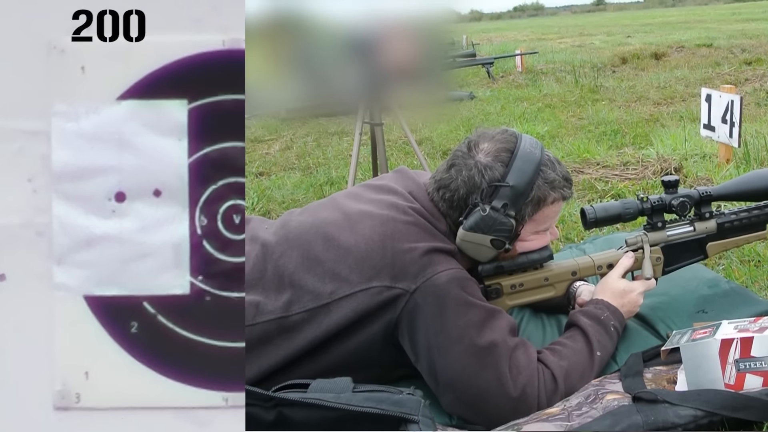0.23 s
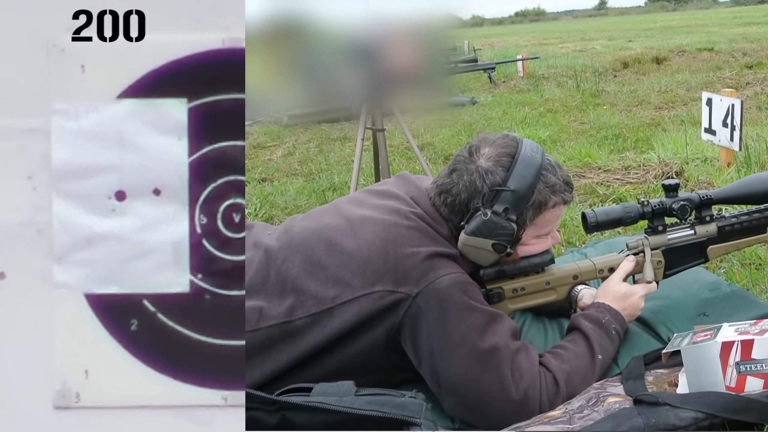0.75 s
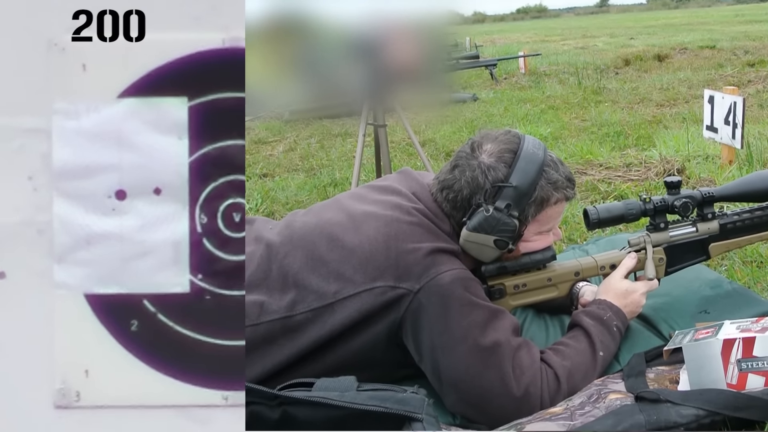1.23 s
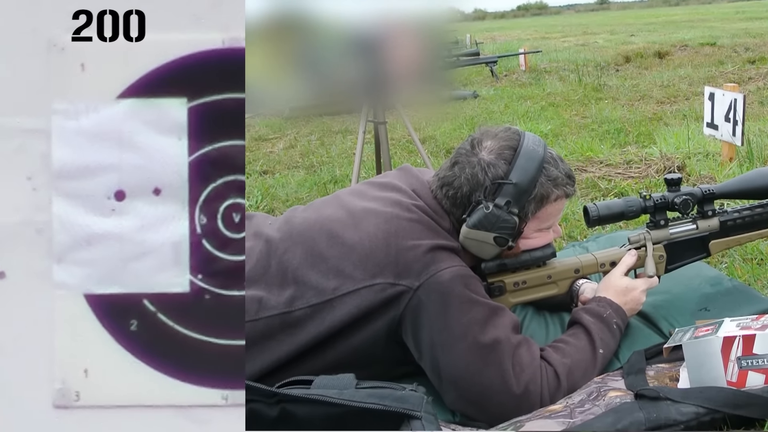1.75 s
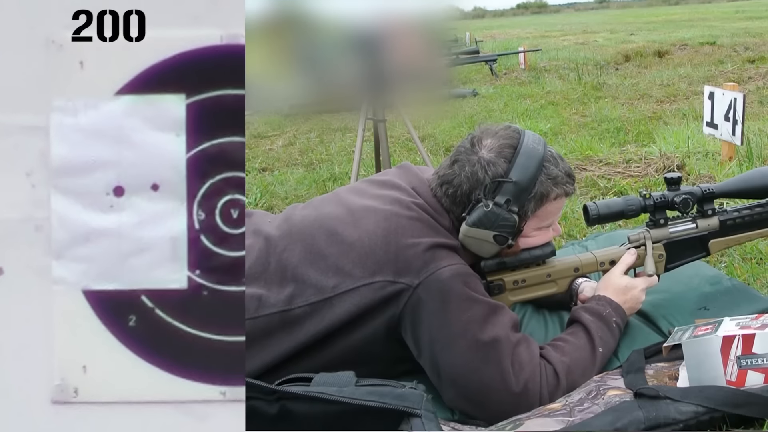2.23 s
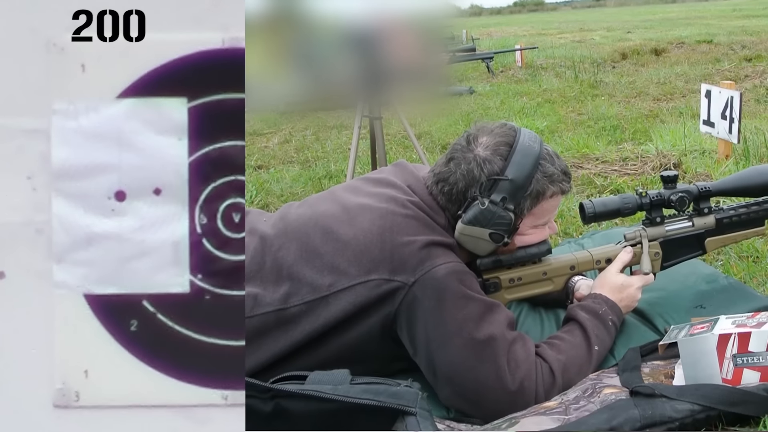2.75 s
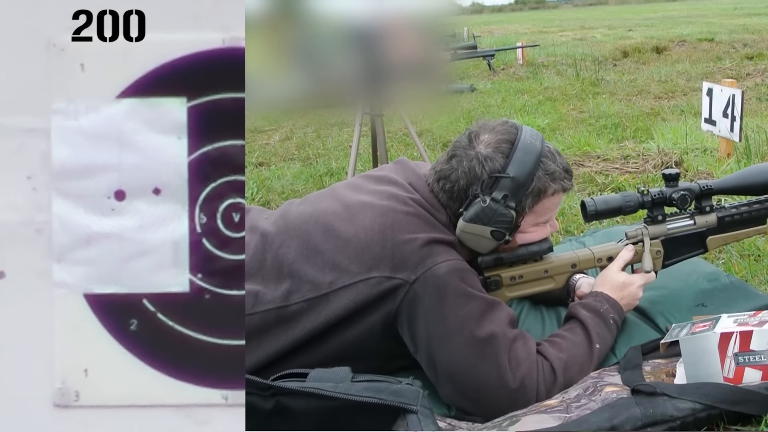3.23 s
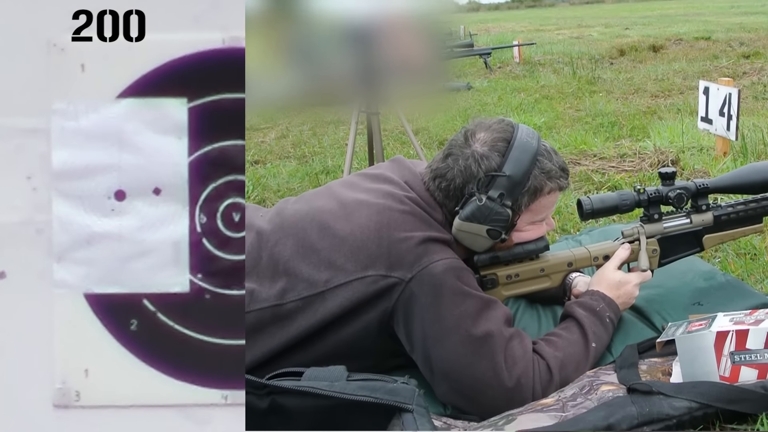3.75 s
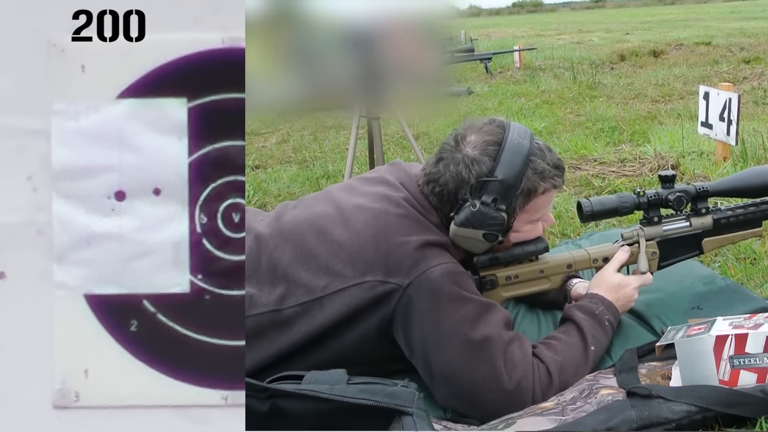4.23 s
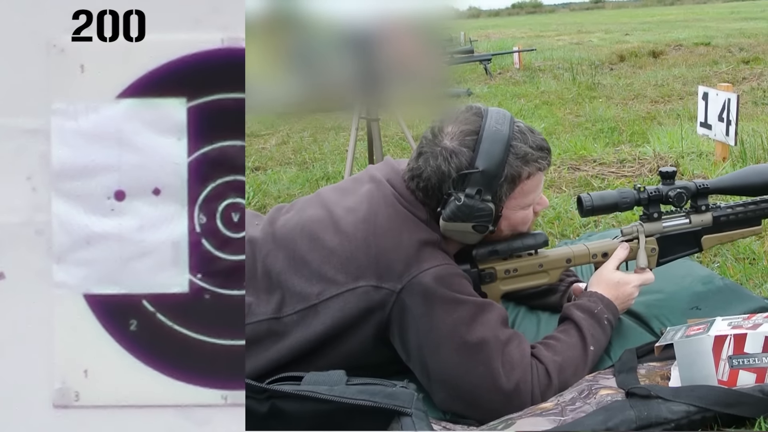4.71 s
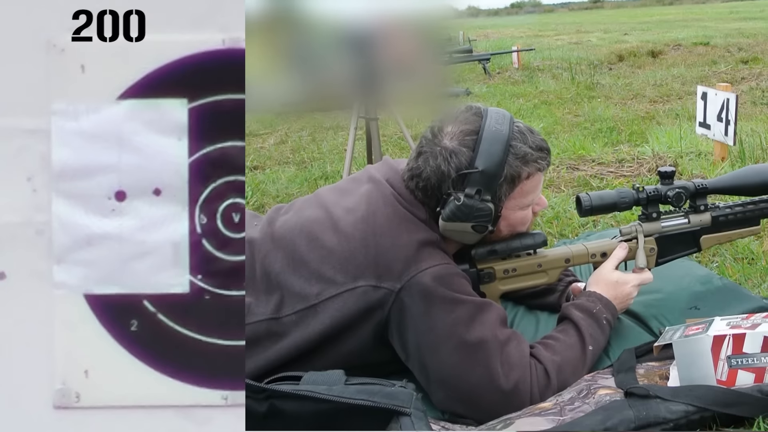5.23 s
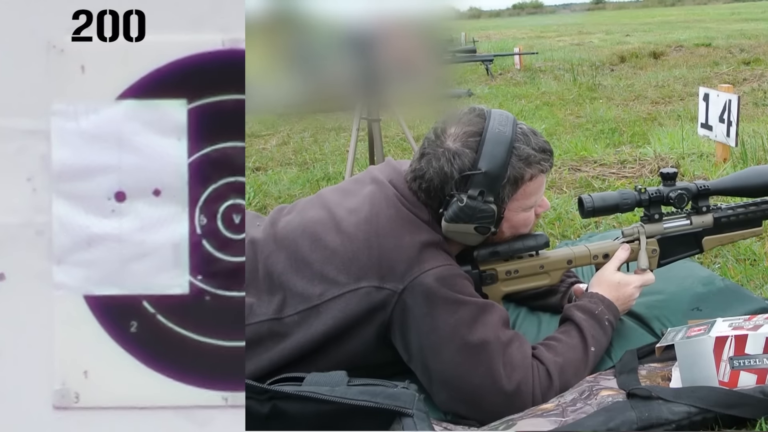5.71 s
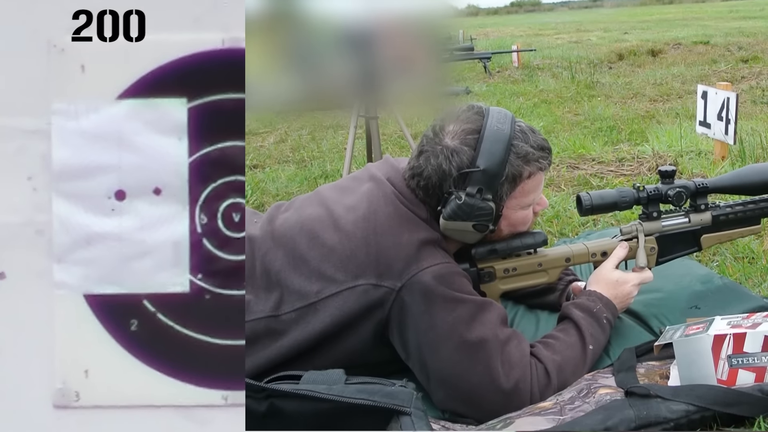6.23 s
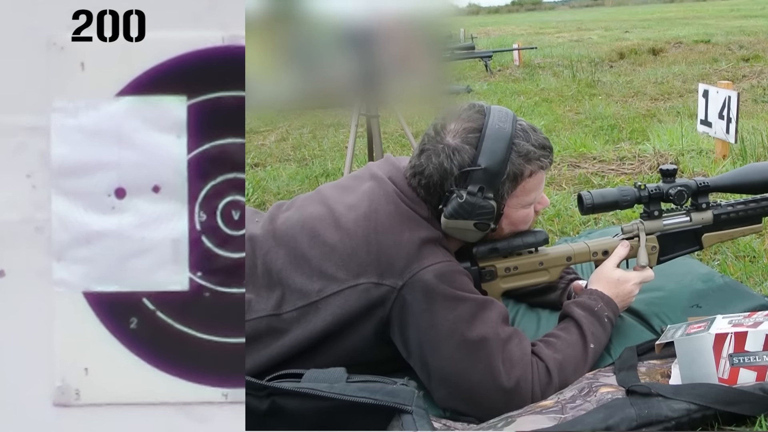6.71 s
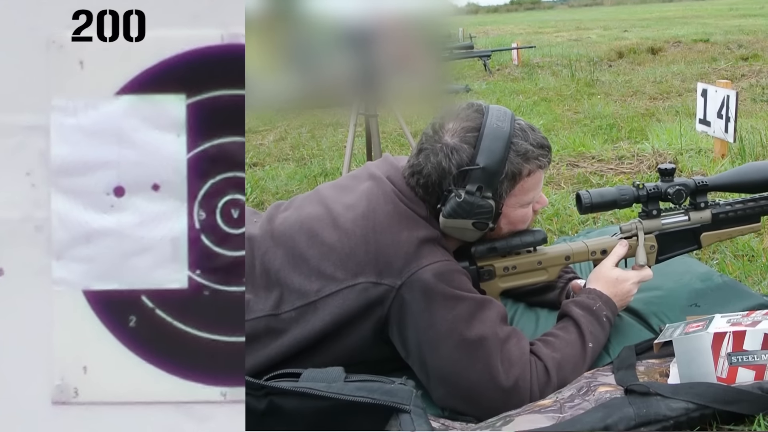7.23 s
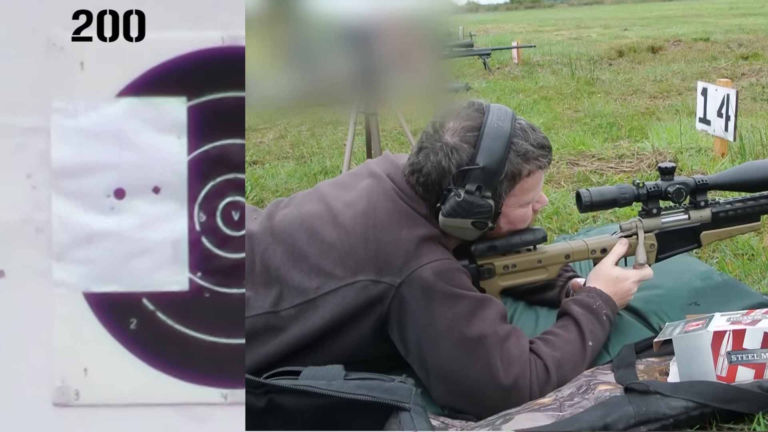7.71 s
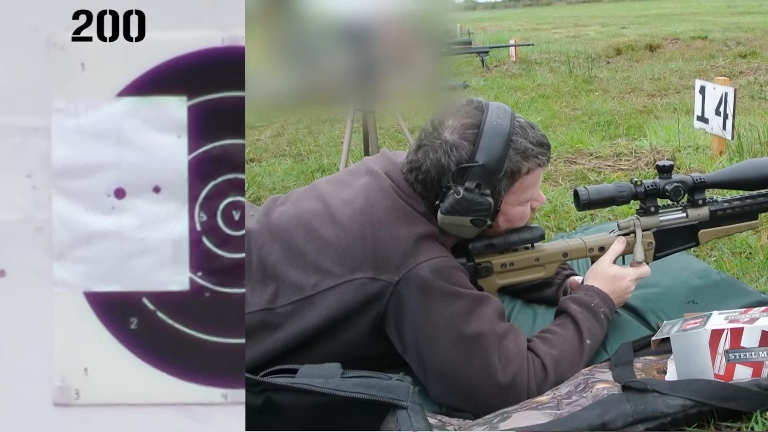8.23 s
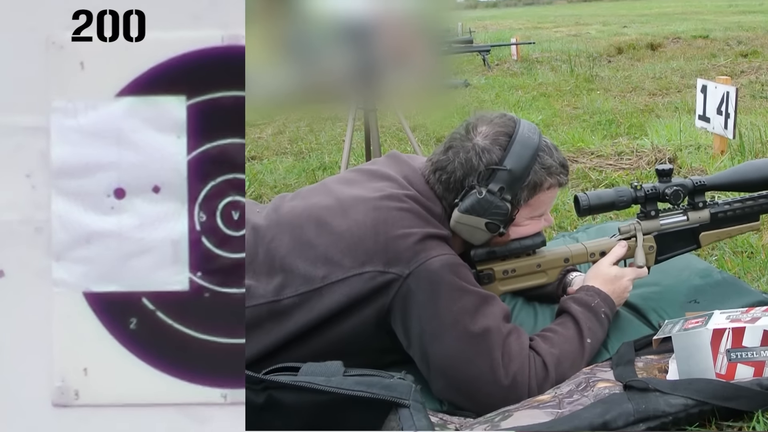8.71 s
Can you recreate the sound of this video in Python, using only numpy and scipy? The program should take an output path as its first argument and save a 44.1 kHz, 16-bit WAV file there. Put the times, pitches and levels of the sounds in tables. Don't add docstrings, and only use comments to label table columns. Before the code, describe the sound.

Four rifle shots crack and boom across an open grass range, echoes hissing away, with bolt clicks between and wind buffeting the microphone.

```python
import sys
import numpy as np
from scipy import signal
from scipy.fft import rfft, irfft
from scipy.io import wavfile

SR = 44100
rng = np.random.default_rng(int(sys.argv[2]) if len(sys.argv) > 2 else 0)


def waveform_to_disk(signal):
    frames = np.transpose(np.atleast_2d(signal))
    scaled = np.clip(frames, -1, 1) * 32767
    samples = np.round(scaled).astype(np.int16)
    wavfile.write(sys.argv[1], SR, samples)


def boost(x):
    u = np.asarray(x, float) / 20
    return 10 ** u


N = 395136
TIME = np.arange(N) / SR
LOW_ROLL_RISE_S = 0.0052

# start_s, hiss_db, hiss_t60_s, pan_db (left-right), wide_db (wider scatter)
SHOTS = [
    (.9030, -21, 0.034, 1.2, -20.5),
    (2.0208, -9.5, 0.027, 0.45, -21.5),
    (5.0483, -12, 0.069, 1, -28),
    (7.1342, -17.5, 0.078, 1, -24),
]
# hiss_db, top_db, low_roll_db, low_roll_fall_db_per_s
ROLL = [
    (-65, -65.5, -30.5, 201),
    (-73.5, -72.5, -33.5, 199.5),
    (-57.5, -60.5, -36, 199.5),
    (-49.5, -52.5, -34.5, 151.5),
]
# frequency_hz, level_db (per Hz)
ROLL_BODY = [(350, -32.5), (600, -13.5), (891, -10), (1130, -7), (1560, 0), (2670, 4.5), (3740, 3.5),
             (6000, -12.5), (7800, -43.5), (13200, -120)]
# frequency_hz, level_db (per Hz)
ROLL_TOP = [(2650, -30), (4500, -1), (6300, -4), (7920, -6), (11000, -20), (14000, -43.5)]
# start_s, peak_db, pitch_hz, pan_db (left-right)
BUFFETS = [(0.324, -44.5, 272, 2.5), (1.89, -32, 164, -1), (3.096, -41.5, 223.5, 0), (3.65, -50.5, 195, -1),
           (3.712, -52, 198, -3.5), (4.832, -43.5, 340, 0), (6.024, -22.5, 150, 1),
           (6.103, -24.5, 162, -3.5), (6.172, -25.5, 194.3, -4), (6.205, -22.5, 189, 7),
           (6.466, -27.5, 186, 5.5), (6.564, -29, 170.5, -4), (6.631, -24, 177.4, 3),
           (6.795, -26, 216, -6.5), (6.947, -17, 174, -4), (7.017, -20.5, 201, 4), (7.041, -25, 179, 9),
           (7.944, -22.5, 248, -2), (8.156, -16.5, 181, 3.5), (8.273, -14.5, 160, 4.5),
           (8.376, -13, 158, -8.5), (8.417, -13, 193.2, 7.5), (8.653, -28.5, 137, 13),
           (8.705, -14.5, 195.8, 11), (8.796, -20.5, 203.7, 11), (8.831, -19.5, 219, 20),
           (8.908, -13, 216, -15)]


def rms_one(x):
    return x / np.sqrt(np.mean(x ** 2) + 1e-20)


def sides(pan_db):
    return boost(np.array([[.5], [-.5]]) * pan_db)


def add(out, s, sound):
    i = round(s * SR)
    out[:, i:i + sound.shape[-1]] += sound[..., :N - i]


def drift(rate):
    pole = np.exp(-80 * np.pi * rate / SR)
    noise = rng.standard_normal(N // 40 + 2002)
    slow = signal.lfilter([1], [1, -2 * pole, pole * pole], noise)[2000:]
    return np.interp(np.arange(N) / 40, np.arange(len(slow)), rms_one(slow))


def coloured(spectrum, side_db, size=N):
    hz, level_db = np.transpose(spectrum)
    log_hz = np.log(np.fft.rfftfreq(size, 1 / SR) + 1)
    gain = boost(np.interp(log_hz, np.log(hz), level_db, left=-120, right=-120))
    mid, side = irfft(rfft(rng.standard_normal((2, size))) * gain, size)
    return rms_one(mid + boost(side_db) * side * [[1], [-1]])


def curve(spans, fade_s):
    gain = np.zeros(N)
    for rows in spans:
        s, level_db = np.transpose(rows)
        s = np.r_[s[0] - fade_s, s, s[-1] + fade_s]
        level_db = np.r_[level_db[0] - 12, level_db, level_db[-1] - 30]
        gain = np.maximum(gain, boost(np.interp(TIME, s, level_db, left=-200, right=-200)))
    return gain


def thump(hz, swell_s, dip_s):
    t = TIME[:2200]
    swell = (t / swell_s * np.exp(1 - t / swell_s)) ** 1.5
    ring = swell * np.sin(2 * np.pi * hz * (t - dip_s))
    return signal.sosfilt(signal.butter(1, 50, "high", fs=SR, output="sos"), ring)


def rings(modes, strengths_db, t):
    total = 0
    for more_db, (hz, db, t60) in zip(strengths_db, modes):
        total = total + boost(db + more_db - 60 * t / t60) * np.sin(2 * np.pi * hz * t)
    return total


def scatter(bright_db, size):
    body = coloured(ROLL_BODY, side_db=-15.5, size=size)
    return body + boost(bright_db + 13.0) * coloured(ROLL_TOP, side_db=-8.0, size=size)


def facing(x):
    # frequency_hz, pan_db (left-right)
    ports = [(3500, 0.5), (5200, 6), (7500, 11), (10000, 5), (12500, -3), (16000, -4)]
    hz, pan_db = np.transpose(ports)
    log_hz = np.log(np.fft.rfftfreq(x.shape[-1], 1 / SR) + 1)
    pan_db = np.interp(log_hz, np.log(hz), pan_db)
    return irfft(rfft(x) * sides(pan_db), x.shape[-1])


def field():
    # start_s, level_db
    hum_levels = [(0, -62), (.9, -65), (2.001, -74), (3.1, -82), (4.6, -73), (5.2, -71.5), (6.5, -66.5),
                  (7.5, -61), (8.96, -57)]
    # frequency_hz, level_db (per Hz)
    hum_colour = [(59, -35.5), (100, -5.5), (210, -5), (381, -1.5), (608, -7.5), (1100, -5), (1610, -8.5),
                  (2040, -12.5), (3700, -16.5), (10700, -28), (12600, -31.5), (13600, -48.5)]
    # start_s, level_db
    grass_levels = [
        (0, -108),
        (6, -106),
        (7, -84),
        (8.96, -84),
    ]
    # frequency_hz, level_db (per Hz)
    grass_colour = [(11000, -20.5), (13000, 0), (15000, -7.5), (15800, -14.5)]
    # pitch_hz, width_hz, level_db
    drone_modes = [
        (1120, 110, -75.5),
        (1650, 60, -76),
        (2200, 110, -80),
    ]
    hum_db = np.interp(TIME, *np.transpose(hum_levels))
    out = boost(hum_db + 0.6 * drift(5)) * coloured(hum_colour, side_db=-8.5)
    grass_db = np.interp(TIME, *np.transpose(grass_levels))
    out += boost(grass_db) * coloured(grass_colour, side_db=-6.0)
    fade_db = np.interp(TIME, [.9, 2.2], [0, -20])
    for hz, width_hz, db in drone_modes:
        skirts = [(hz - 2 * width_hz, -25), (hz, 0), (hz + 2 * width_hz, -25)]
        out += coloured(skirts, side_db=-10.5) * boost(db + 2.3 * drift(6) + fade_db)
    return out


def port_gains():
    # start_s, throb_db, deep_db (relative to the throb)
    wind_levels = [(0, -76, 8), (.22, -62, -3), (.45, -82, 9), (.9, -77, 2), (1.299, -53, -9.5),
                   (1.581, -55, 1.5), (1.802, -66.5, -10.5), (2.302, -60, -14.5), (2.55, -50.5, -12),
                   (2.719, -95.5, -11), (3.4, -81, -1), (4.881, -79.5, -2), (5.0, -66, -13),
                   (5.751, -64.5, 1.5), (6.35, -63, 6.5), (6.751, -42, -4), (7.75, -57, -1.5),
                   (8.96, -47, 7.5)]
    # start_s, throb_db, fall_db_per_s
    gusts = [(1.624, -44.5, 250), (2.0, -59.5, 349.5), (2.519, -55.5, 198.5), (2.659, -59, 302),
             (2.811, -59, 178), (3.03, -58.5, 252), (2.95, -60.5, 299.5), (5.575, -47, 256),
             (5.625, -48.5, 250), (7.289, -43.5, 200), (7.39, -54, 250), (7.47, -50, 300),
             (7.57, -49.5, 150.5), (8.31, -33, 199), (5.676, -48, 299.5), (5.845, -43, 343)]
    s, throb_db, deep_db = np.transpose(wind_levels)
    throb = boost(np.interp(TIME, s, throb_db))
    deep = boost(np.interp(TIME, s, throb_db + deep_db))
    # lag 0.0058 s, 17.5 dB weaker, falling 165.5 dB per s
    wakes = [(s + 0.0058, peak_db - 17.5, 165.5) for s, peak_db, *rest in BUFFETS]
    coarse = TIME[::64]
    swell_db = np.full(len(coarse), -200.)
    for s, peak_db, fall in gusts + wakes:
        away_s = np.maximum(coarse - s, 2.2 * (s - coarse))
        swell_db = np.maximum(swell_db, peak_db - fall * away_s)
    swell_db = np.interp(TIME, coarse, swell_db)
    throb = np.hypot(throb, boost(swell_db))
    deep = np.hypot(deep, boost(swell_db - 7.5))
    for (s, *rest), (*hiss, low_db, fall) in zip(SHOTS, ROLL):
        after = np.maximum(TIME - s, 0)
        rise = np.minimum(after / LOW_ROLL_RISE_S, 1) ** 2
        deep = np.maximum(deep, rise * boost(low_db - 10.5 - 1.5 * fall * after))
    return throb, deep


def wind():
    # frequency_hz, level_db (per Hz)
    throb_colour = [(71, -38.5), (120, 2), (211, 4), (330, -9.5), (403, -19), (517, -23.5), (600, -31.5),
                    (780, -61), (1320, -120)]
    gust_colour = [(160, -31), (280, 1.5), (433, -9.5), (484, -16), (675, -25.5), (900, -27), (1170, -59.5),
                   (1980, -120)]
    rumble_colour = [(12, -59), (20, -32.5), (54, -11.5), (87, -0.5), (130, 0.5), (170, -29.5), (290, -120)]
    throb, deep = port_gains()
    out = throb * boost(-3.0 + 4.9 * drift(18)) * coloured(throb_colour, side_db=-12.0)
    out += throb ** 1.23 * boost(-2.0 + 4.6 * drift(28)) * coloured(gust_colour, side_db=-2.0)
    out += deep * boost(-1.0 + 0.46 * drift(8)) * coloured(rumble_colour, side_db=-12.0)
    for s, peak_db, hz, pan_db in BUFFETS:
        puff = thump(hz, 0.65 / hz, dip_s=0.41 / hz) * sides(pan_db)
        front = np.roll(thump(2.06 * hz, 0.5 / hz, dip_s=0), 110)
        edge = boost(-16.0) * front * sides(-pan_db)
        add(out, s + 0.00291, -boost(peak_db - 4.0) * (puff + edge))
    return out


def action():
    # start_s, peak_db, brass_db (brass ring)
    contacts = [(3.2179, -56, -28.5), (3.2368, -63.5, -17), (3.256, -48, -32), (3.2713, -54, -15),
                (3.2976, -46.5, -15), (3.362, -57, -20), (3.9554, -44, -4.5), (3.985, -59.5, -20),
                (4.021, -62.5, -25), (4.034, -49.5, -7.5), (4.0555, -51, -11), (4.076, -51, -7),
                (4.0968, -37, -22), (4.105, -41, -6), (4.121, -45, -13), (4.1403, -49.5, -6.5),
                (4.1524, -50.5, -15), (4.1579, -50, -17), (4.185, -53, -13), (4.209, -63, -28),
                (4.2254, -55.5, -27), (4.2616, -54.5, -26), (4.283, -66, -31), (4.3, -40.5, -28),
                (4.3319, -56, -32), (4.351, -65.5, -30)]
    # pitch_hz, level_db, t60_s
    steel_modes = [(1552, -10, 0.022), (2140, -16, 0.023), (2967, 0, 0.022), (3185, -6, 0.033),
                   (4214, -14, 0.031), (6500, -9, 0.019), (7000, -4, 0.013), (7460, -10, 0.017),
                   (8214, -11, .015), (11300, -20, .012), (12500, -21, .012)]
    # pitch_hz, level_db, t60_s
    brass_modes = [(6190, 13, 0.041), (6370, -1, .04), (7000, 2, 0.033), (10260, -21, .05),
                   (12020, -10, .03), (13610, -12, .06), (14440, -11, .09)]
    # start_s, level_db
    slide_levels = [
        [(3.22, -81), (3.3, -74.5), (3.4, -80.5)],
        [(3.96, -78), (4.03, -76), (4.1, -77), (4.155, -59.5), (4.18, -75), (4.27, -73), (4.36, -79)],
    ]
    # frequency_hz, level_db (per Hz)
    grate_colour = [(900, -21), (1550, -5), (1800, -12), (2100, -2), (2500, -18), (3100, -2), (4300, -27),
                    (7000, -19), (9500, -32)]
    out, t = np.zeros((2, N)), TIME[:4096]
    soft = np.minimum(t / .0004, 1)
    for s, peak_db, brass_db in contacts:
        for lag_s, loss_db in ((0, 0), (.004, -14)):
            chance_db = rng.normal(0, 4, len(steel_modes) + len(brass_modes))
            metal = rings(steel_modes, chance_db, t * rng.uniform(0.95, 1.04))
            brass_strengths_db = brass_db + 1.4 * chance_db[::-1]
            metal = metal + rings(brass_modes, brass_strengths_db, t * rng.uniform(0.98, 1.004))
            tick = scatter(-22.5, len(t)) * boost(0.5 - 60 * t / 0.019)
            add(out, s + lag_s, (metal + tick) * soft * boost(peak_db + loss_db - 12.0) * sides(5.73))
    grate = coloured(grate_colour, side_db=-10.5) * boost(4.5 * drift(70))
    return out + curve(slide_levels, fade_s=0.0094) * grate * sides(1.3)


def slaps():
    # start_s, peak_db, pitch_hz, pan_db (left-right), bright_db
    slap_echoes = [(0.9175, -28, 2600, 2, -15), (0.9327, -21, 3270, 2, -33), (0.9350, -21, 2300, -1, -24),
                   (1.158, -40, 1270, 1, -40.5), (1.224, -56, 2500, 1, -21), (1.29, -50.5, 650, 2, -40),
                   (0.9537, -31.5, 1900, 7, -17), (1.115, -36, 3040, 2, -13.5), (1.1571, -36, 3330, 4, -17),
                   (1.1859, -42, 3050, 5.5, -17.5), (1.215, -44, 2400, 0.5, -14),
                   (1.29, -42, 2520, -4, -36.5), (2.03, -25, 3020, -3, -22.5),
                   (2.0521, -17.5, 2674, -2, -27), (2.0365, -22, 2700, 0.5, -34),
                   (2.046, -26.5, 2800, -2, -32), (2.0761, -42, 2390, 2, -30),
                   (2.093, -42, 1912, 1.0, -29.5), (2.1769, -56.5, 3046, 2, -29),
                   (2.2272, -58, 3016, 3, -35), (2.258, -55, 2107, 3, -35.5), (2.329, -48.5, 586, 2, -41),
                   (2.321, -44, 2010, -4, -20), (2.3357, -45, 2045, -3.5, -32), (2.4038, -41, 3240, 2, -24),
                   (2.4217, -29.5, 4047, -3.5, -18), (2.8363, -45.5, 4100, -6, -23),
                   (5.37, -43.5, 1290, -3, -29), (5.3834, -23.5, 2584, 1, -26.5),
                   (6.958, -53, 600, 2, -40.5), (8.379, -52, 590, -3, -39), (7.3903, -32, 4470, 5, -25),
                   (7.3912, -27.5, 2900, 0, -22), (7.422, -36, 2925, 8, -28), (7.3905, -31.5, 1500, 2, -30),
                   (7.448, -36.5, 1150, 0, -35), (1.115, -43, 1600, 0, -14)]
    # start_s, peak_db, pitch_hz, pan_db (left-right), bright_db
    far_cracks = [(.0913, -50.5, 2230, 4, -29.5), (.382, -50.5, 3960, 3.5, -23),
                  (.527, -57, 2900, 0.5, -30), (.616, -49.5, 3570, -3.5, -32), (.839, -54, 3000, 0.5, -28),
                  (.868, -57, 2500, 0.5, -28), (1.833, -58, 8200, 1.5, -10),
                  (1.8896, -42.5, 2040, 1.5, -30), (1.8906, -40.5, 895, 0, -45),
                  (2.319, -57, 8500, 0.5, -25), (3.0977, -49.5, 2147, 2, -33.5),
                  (4.824, -50, 3109, 5, -27.5), (4.8324, -34, 2900, 4, -11),
                  (4.8325, -41.5, 1950, 4, -29.5), (4.8327, -44, 593, 2, -40), (6.883, -48, 1919, 3, -28.5),
                  (7.355, -53, 13100, -0.5, -45), (7.355, -60, 15000, 0, -45)]
    # start_s, peak_db, bright_db, t60_s
    swells = [(1.145, -44, -12, 0.14), (1.176, -44, -14, 0.13), (7.421, -36, -14, 0.13),
              (7.452, -39, -5, 0.12), (2.782, -54.5, -10, 0.077), (1.3657, -43.5, -28.5, 0.12),
              (1.566, -43.5, -17.5, 0.19), (1.595, -42.5, -12.5, 0.052), (1.705, -57.5, -6.5, 0.13),
              (2.302, -51, -26.5, 0.3), (2.479, -48.5, -18.5, 0.184), (2.7518, -47, -19, 0.15),
              (2.8915, -58.5, -12, 0.18), (3.053, -50.5, -17.5, 0.1), (5.4, -40, -17, 0.24),
              (5.4532, -37.5, -14, 0.081), (5.7833, -33.5, -19, 0.11), (5.817, -24.5, -29, 0.043),
              (5.918, -41.5, -17, 0.11), (6.097, -52, -29, 0.12), (7.444, -25.5, -22, 0.099),
              (1.42, -46.5, -24.5, 0.42), (2.56, -52.5, -29.5, 0.59), (7.806, -25.5, -21, 0.073),
              (7.8352, -25, -17, 0.05), (7.9429, -27.5, -26, 0.22)]
    # start_s, peak_db, t60_s
    thuds = [
        (.953, -47, .03),
        (2.03, -41.5, .15),
        (2.322, -61, 0.078),
        (5.775, -67, 0.18),
        (6.02, -58, 0.11),
        (6.204, -58, 0.058),
        (6.95, -47.5, 0.043),
        (7.944, -46.5, 0.62),
    ]
    # frequency_hz, level_db (per Hz)
    thud_colour = [(250, -25), (400, -2), (700, -0.5), (1100, -1.5), (1600, -19)]
    out, t = np.zeros((2, N)), TIME[:8192]
    for s, peak_db, hz, pan_db, bright_db in slap_echoes + far_cracks:
        burst = np.sin(2 * np.pi * hz * t) * boost(-1 - 60 * t / .007)
        burst = burst + boost(-9.0) * scatter(bright_db, len(t)) * boost(-60 * t / 0.013)
        add(out, s, burst * boost(peak_db + 4.5) * np.minimum(t / 0.00077, 1) * sides(pan_db))
    for s, peak_db, bright_db, t60 in swells:
        fall = boost(peak_db - 11.5 - 60 * t / t60)
        add(out, s, scatter(bright_db, len(t)) * fall * np.minimum(t / 0.0016, 1))
    for s, peak_db, t60 in thuds:
        dull = coloured(thud_colour, side_db=-14.0, size=len(t))
        add(out, s, dull * boost(peak_db - 60 * t / t60) * np.minimum(t / .003, 1))
    return out


def echo_gains():
    # delay_s, level_db
    ground = [(.03, -6), (.07, -2.5), (.18, -6.5), (.35, -5.5), (.55, -5), (.8, -0.5), (.925, -3.5),
              (.965, -8), (1.3, -23)]
    # delay_s, lift_db, half_width_s
    banks = [
        (.28, 1, 0.043),
        (0.432, 4, 0.14),
        (0.711, 12.5, .04),
        (.88, 8.5, 0.12),
    ]
    path_stretch = [
        1.03,
        1.11,
        1.075,
        1.01,
    ]
    body, top, t = np.zeros((1, N)), np.zeros((1, N)), TIME[:65536]
    for (s, *rest), (hiss_db, top_db, *low), stretch in zip(SHOTS, ROLL, path_stretch):
        delay = t / stretch
        land_db = np.interp(delay, *np.transpose(ground), left=-300, right=-300)
        for at, lift_db, half in banks:
            land_db += lift_db * np.clip(1 - abs(delay - at) / half, 0, 1)
        add(body, s, boost(hiss_db + land_db)[None])
        air_db = -19.5 * t + 15.5 * np.exp(-t / 0.066)
        add(top, s, boost(top_db + .75 * land_db + air_db)[None])
    return body, top


def roll():
    since = TIME - np.maximum.reduce([s * (TIME > s) for s, *rest in SHOTS])
    hiss = coloured(ROLL_BODY, side_db=-22.5)
    dark = signal.sosfilt(signal.butter(1, 1800, fs=SR, output="sos"), hiss)
    far = np.clip((since - .6) / 0.66, 0, 1)
    body_gain, top_gain = echo_gains()
    body = body_gain * ((1 - far) * hiss + far * boost(6.5) * dark)
    top = top_gain * coloured(ROLL_TOP, side_db=-13.5)
    return boost(1.3 * drift(25)) * (boost(0.5) * body + boost(4.0) * top)


def low_roll():
    # frequency_hz, level_db (per Hz)
    dark_colour = [(90, -25.5), (140, -3.5), (200, -0.83), (300, -3), (400, -20), (600, -46.5)]
    early_colour = [(200, -24.5), (280, -3), (370, 2), (480, -5.5), (620, -18.5), (900, -35.5)]
    early_levels = [
        -12.5,
        -3,
        -5.5,
        -15,
    ]
    gain, early = np.zeros(N), np.zeros(N)
    for (s, *rest), (*hiss, low_db, fall), early_db in zip(SHOTS, ROLL, early_levels):
        after = np.maximum(TIME - s, 0)
        start = np.minimum(after / LOW_ROLL_RISE_S, 1) * boost(low_db)
        gain += start * (boost(-fall * after) + boost(-16 - 0.2 * fall * after))
        early += start * boost(early_db - 0.79 * fall * after)
    dark = gain * boost(1.9 * drift(14)) * coloured(dark_colour, side_db=-17.5)
    return dark + early * coloured(early_colour, side_db=-14.0)


def sheen():
    sheen_levels = [
        -70,
        -68,
        -53,
        -50.5,
    ]
    # centre_hz, level_db, fall_db_per_s
    sheen_bands = [
        (10480, 0, 120),
        (12000, -3, 90),
        (13500, -5.5, 130),
        (14933, -7, 220),
    ]
    out, t = np.zeros((2, N)), TIME[:32768]
    bands = []
    for hz, *rest in sheen_bands:
        shape = [(.84 * hz, -30), (.94 * hz, -3), (hz, 0), (1.06 * hz, -3), (1.16 * hz, -30)]
        bands.append(coloured(shape, side_db=-6.0, size=65536))
    for k, ((s, *rest), level_db) in enumerate(zip(SHOTS, sheen_levels)):
        piece = slice(8192 * k, 8192 * k + len(t))
        tail = sum(band[:, piece] * boost(level_db + db - fall * t)
                   for band, (hz, db, fall) in zip(bands, sheen_bands))
        add(out, s, tail)
    return out


def whine():
    # start_s, pitch_hz, level_db
    whistles = [
        [(5.051, 10000, -40), (5.0535, 9600, -16), (5.060, 8300, -9.5), (5.066, 7500, -15), (5.073, 6900, -17),
         (5.080, 6500, -25), (5.082, 6400, -45)],
        [(5.048, 3800, -30), (5.0495, 3700, -15), (5.055, 3000, -21), (5.058, 2800, -40)],
        [(5.089, 8500, -55), (5.092, 8300, -37), (5.098, 7600, -39), (5.101, 7400, -55)],
    ]
    out, waver, flutter_db = 0, 1 + .012 * drift(250), 2.4 * drift(300)
    for s, hz, level_db in map(np.transpose, whistles):
        tone = np.sin(2 * np.pi * np.cumsum(np.interp(TIME, s, hz) * waver) / SR)
        tone_db = np.interp(TIME, s, level_db, left=-200, right=-200)
        out = out + tone * boost(tone_db - 5.5 + flutter_db)
    return out * sides(11)


def shots():
    # start_s, peak_db, pitch_hz, swell_s, sign
    blast_booms = [(.9015, -12, 116, .0019, -1), (.9020, -21, 329, .0059, -1), (.9028, -.5, 204, .0038, 1),
                   (2.0205, -2, 222, .0010, -1), (2.0217, 2, 230, .0010, -1), (2.0256, -8, 243, .0029, 1),
                   (2.0329, -22, 207, .0046, -1), (5.0470, -14, 340, .0026, -1),
                   (5.0482, -7.5, 201, .0033, 1), (5.0626, -29, 195, .0023, 1),
                   (7.1345, -18, 300, .0045, 1), (7.1347, -2.5, 204, .0031, 1),
                   (7.1658, -20.5, 216, .0028, 1), (7.1794, -19.5, 199, .0022, -1)]
    # snap_db, snap_hz, knock_height, knock_hz, snap_t60_s
    fronts = [
        (8, 2300, 0.93, 1050, .003),
        (13.5, 2550, 2.5, 900, .0038),
        (-13, 2500, -0.28, 1100, 0.0036),
        (-17, 2300, 0.2, 1960, 0.0027),
    ]
    # frequency_hz, level_db (per Hz)
    near_hiss = [(290, -32.5), (500, -3), (933, -13.5), (1870, -12), (2260, -7), (2850, -6), (4280, -17.5),
                 (8090, -15.5), (11000, -28.5), (13500, -24.5), (16000, -27.5)]
    far_hiss = [(290, -31), (500, -19.5), (1000, -27), (1340, -9.5), (1740, -16.5), (1950, -10), (2570, -5),
                (2770, -3), (3200, 0.5), (5800, -10), (6900, -0.5), (9000, -7), (11000, -16), (14000, -14),
                (16000, -20)]
    out, t = np.zeros((2, N)), TIME[:16384]
    for s, peak_db, hz, swell_s, sign in blast_booms:
        add(out, s, sign * boost(peak_db) * thump(hz, swell_s, dip_s=.0011))
    for k, (shot, front) in enumerate(zip(SHOTS, fronts)):
        s, hiss_db, t60, pan_db, wide_db = shot
        snap_db, hz, knock, knock_hz, snap_t60 = front
        out *= (TIME < s - .004) | (TIME >= s)
        snap = -np.sin(2 * np.pi * hz * t)
        snap = snap - boost(-7.5) * np.sin(2 * np.pi * 1.4 * hz * t)
        snap = snap * boost(snap_db - 60 * t / snap_t60)
        snap += knock * np.sin(2 * np.pi * knock_hz * t) * boost(-60 * t / 0.0045)
        snap = np.stack([snap, np.r_[0, snap[:-1]]])
        gas = coloured(near_hiss if k < 2 else far_hiss, side_db=-9.0, size=len(t))
        near = facing(gas) * boost(-60 * t / t60)
        wide = gas * boost(wide_db - 60 * t / (6.0 * t60))
        hiss = boost(hiss_db) * (near + wide) * np.minimum(t / 0.0016, 1)
        add(out, s, snap + hiss * sides(pan_db))
    return out


def scene():
    background = field() + wind() + action()
    echoes = slaps() + roll() + low_roll() + sheen()
    return background + echoes + whine() + shots()


def roll_off(x):
    return signal.sosfilt(signal.butter(12, 16450, fs=SR, output="sos"), x)


def record(dry):
    low_pass = signal.butter(12, 15900, fs=SR, output="sos")
    high_pass = signal.butter(3, 42, "high", fs=SR, output="sos")
    overloaded = np.clip(dry, -.97, .97)
    mix = signal.sosfilt(np.vstack([low_pass, high_pass]), overloaded)
    return roll_off(np.clip(mix, -1, 1))


dry = scene()
out = record(dry)
waveform_to_disk(out)
```